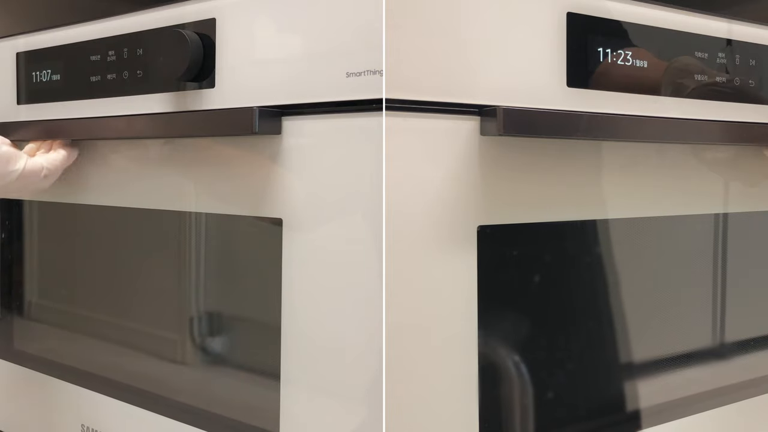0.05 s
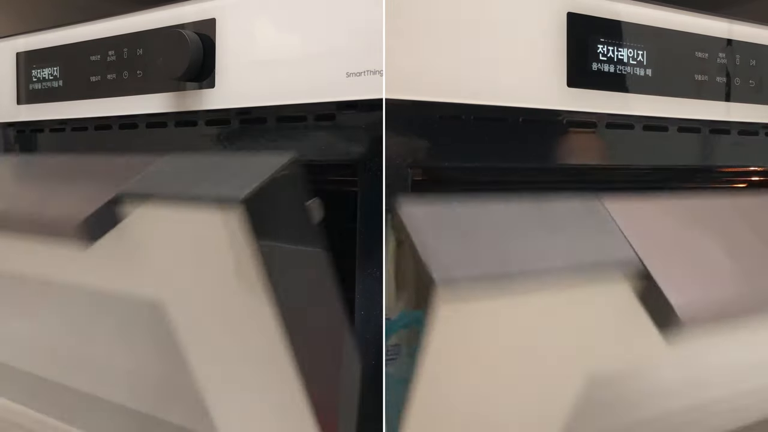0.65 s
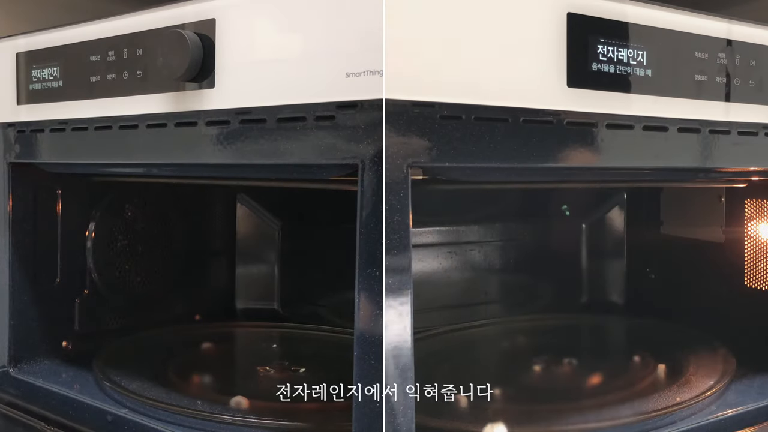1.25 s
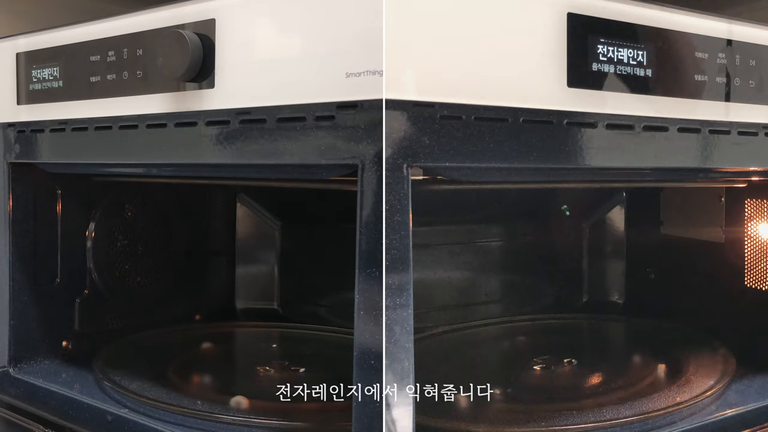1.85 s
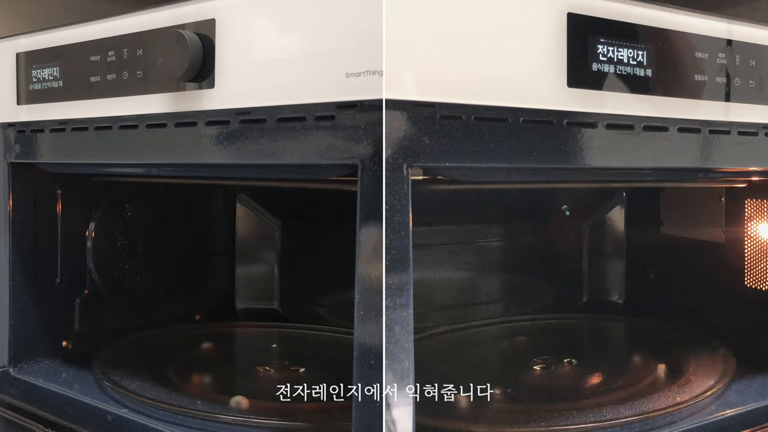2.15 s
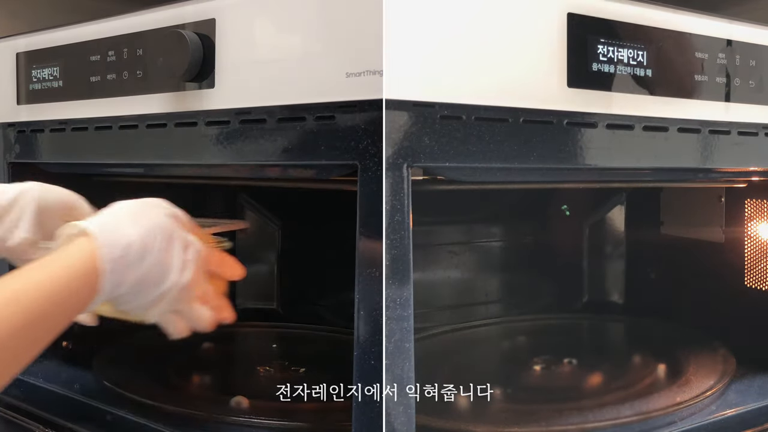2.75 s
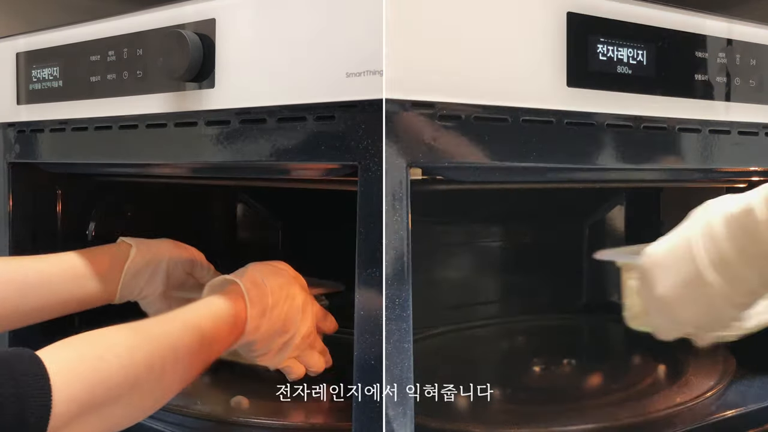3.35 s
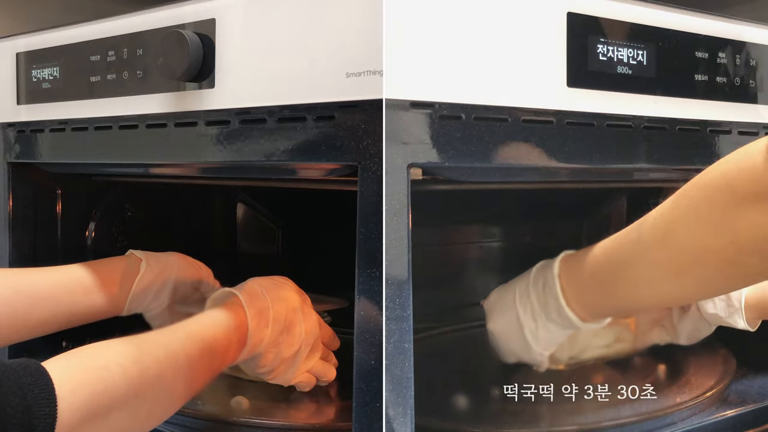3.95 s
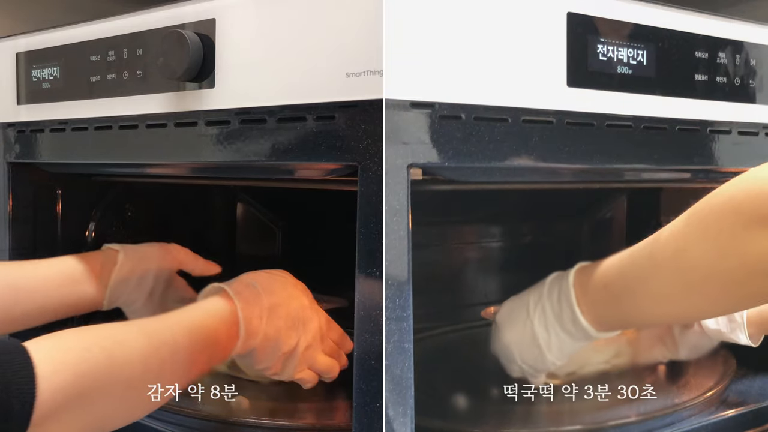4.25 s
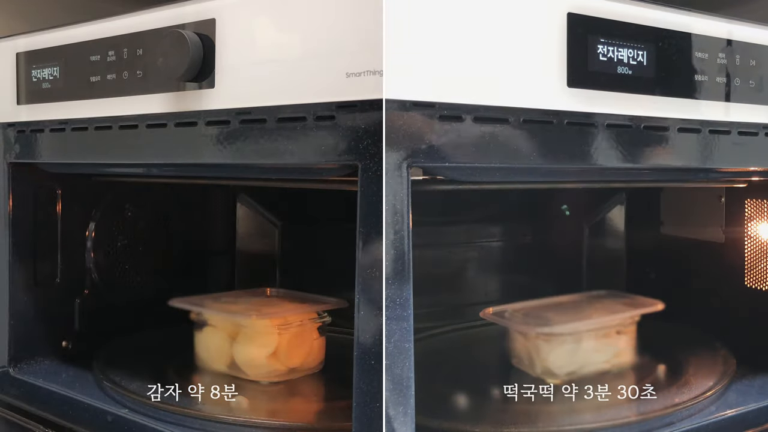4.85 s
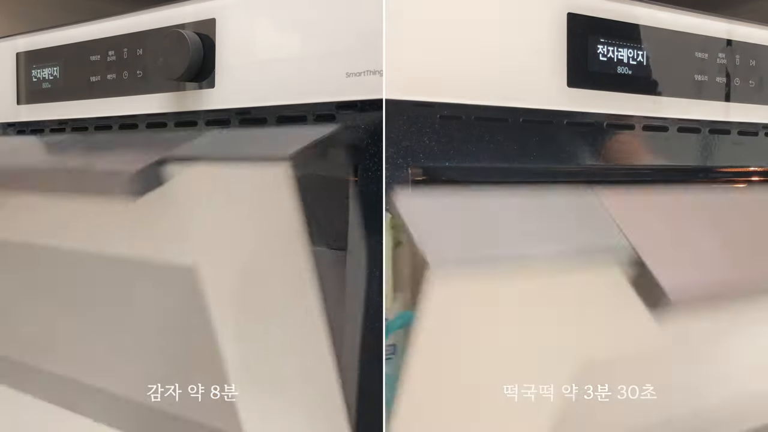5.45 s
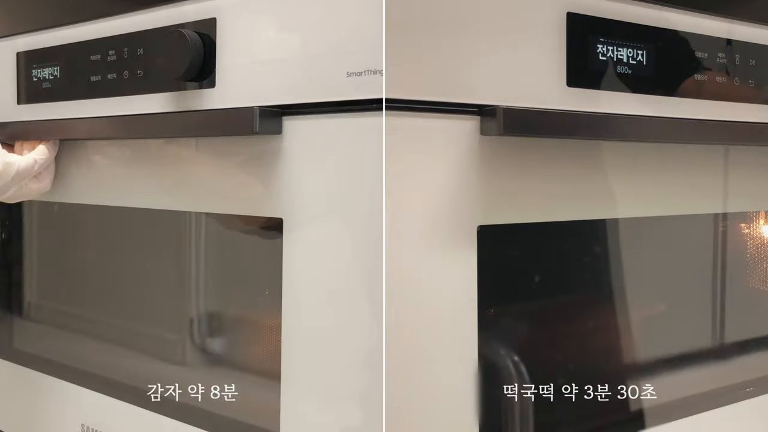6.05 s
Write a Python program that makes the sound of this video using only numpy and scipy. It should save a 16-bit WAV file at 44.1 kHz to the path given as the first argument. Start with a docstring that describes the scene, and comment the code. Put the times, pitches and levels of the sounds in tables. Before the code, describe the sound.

An oven door creaks and clicks in its steel latch, snaps free and swings down with a low rumble. Gloves and sleeves rustle faintly and a plastic lid ticks. A glass container clinks loudly onto the glass turntable and rocks to rest. The door knocks, then shuts with a thump and a last rattling click. Heard close on one microphone in a small kitchen, over a faint appliance hum.

```python
"""A glass food container clinks onto the glass turntable of a countertop oven and rocks to rest.
Before it, the oven door creaks in its latch, snaps free and swings down; afterwards the door knocks
as it is lifted, shuts with a thump and clicks again. Gloves and sleeves rustle, the plastic lid ticks
and an appliance hums faintly behind. Heard close in a small kitchen, on one microphone."""
import sys
import numpy as np
from scipy import signal
from scipy.fft import rfft, irfft, next_fast_len
from scipy.io import wavfile
from scipy.ndimage import map_coordinates

SR = 44100
rng = np.random.default_rng(int(sys.argv[2]) if len(sys.argv) > 2 else 0)


def transcribe(u):
    """Save the signal u as a 16-bit wav file named by the first command-line argument.

    u: samples, shape (n,) or (channels, n), limited to [-1, 1]; the rate is SR.
    q: integer samples, one column per channel.
    """
    v = np.clip(np.atleast_2d(u).T, -1, 1)
    q = np.round(v * 32767).astype(np.int16)
    wavfile.write(sys.argv[1], SR, q)


N = 269010

# the container landing and rocking: t/s, level/dB, contact cut-off/Hz, ring length ratio, clack/dB
LANDINGS = [(3.9088, -18.5, 2620, 0.28, 3.5), (3.9126, -19.5, 12500, 0.82, -12.5),
            (4.0111, -33, 4500, 0.77, 8), (4.022, -48.5, 169, 1.28, -3), (4.04, -35.5, 1050, 0.59, 3),
            (4.056, -43.5, 3600, 1.06, 2.5), (4.175, -56.5, 1935, 1, 1), (4.275, -59.5, 740, 0.66, 7)]
# container and turntable ringing together: f/Hz, level/dB, t60/s
GLASS_MODES = [(142, -31, .65), (232, -27, .3), (445, -24, .15), (530, -24, .18), (606, -18, .2),
               (860, -17, .24), (918, -4, .08), (972, -13, .19), (1015, -16, .2), (1085, -14, .16),
               (1440, -22, .24), (1493, -11, .09), (1641, -16, .14), (1690, -9, .15), (1794, -12, .23),
               (1981, -11, .12), (2060, -15, .12), (2165, -16, .17), (2617, -5, .14), (2686, -12, .14),
               (2875, -8, .14), (2917, 1, .085), (3338, -16, .1), (3564, -20, .19), (4097, -8, .115),
               (4224, -12, .07), (4642, -23, .17), (5352, -14, .14), (5643, -21, .17), (6740, -31, .2),
               (9195, -34, .12)]
# spectra of glass clacking and grinding on glass: f/Hz, level/dB
GLASS_CLACK = [(80, -31), (350, -20.5), (700, -12), (950, -1.5), (1250, -17), (1700, -3), (2300, -8.5),
               (2900, -2), (3400, -14), (4500, -16.5), (7000, -32.5), (16000, -35.5)]
GLASS_GRIT = [(500, -27.5), (4000, -1), (8500, 0), (12000, -7.5), (16000, -8.5)]
# blows on the door panel: t/s, level/dB, contact cut-off/Hz
DOOR_BLOWS = [(0.289, -53.5, 1490), (0.41, -57, 353), (0.48, -50, 700), (0.504, -47.5, 740),
              (0.529, -31.5, 1590), (0.551, -40, 910), (0.968, -63.5, 1170), (5.764, -41, 752),
              (5.779, -42.5, 450), (5.876, -53.5, 400), (5.975, -59.5, 450), (6.028, -53.5, 710)]
# modes of the hollow door and of its boom on the seal: f/Hz, level/dB, t60/s
DOOR_MODES = [(176, -14.5, 1), (307, -5, 0.28), (399.4, -3.5, 0.19), (485, 5, 0.084), (544, -2, 0.25),
              (690, -9, 0.071), (773, -1.5, 0.062), (847, 14.5, 0.03)]
BOOM_MODES = [(71, -9, 0.16), (93, -3, .2), (119, -29.5, 0.23)]
# spectra of the door's rattle and of its hinges: f/Hz, level/dB
DOOR_RATTLE = [(80, -47), (300, -26), (700, -3), (1100, -12), (3000, -18), (9000, -47)]
HINGE_RUMBLE = [(40, -10), (80, 4), (180, 4), (320, 0.5), (440, -4), (700, -9), (1500, -16.5), (4000, -39)]
# the door's swings, one curve down and one up: t/s, level/dB
SWINGS = [
    [(0, -93), (0.15, -64), (0.35, -67), (0.5, -48), (0.68, -58), (0.8, -69.5), (0.87, -90), (0.98, -62),
     (1.15, -83)],
    [(5.1, -43.5), (5.2, -60.5), (5.3, -69.5), (5.42, -68), (5.6, -81), (5.76, -81), (5.84, -57),
     (5.95, -63.5), (6.1, -48)],
]
# latch clicks and, at 6.065 s, a faint bright rattle leading into the last click:
# t/s, level/dB, tilt/(dB per octave), rattle t60/s
CLICKS_AND_RATTLE = [(0.2655, -51, 9, 0.11), (0.292, -49.5, 2.5, 0.13), (0.3708, -52, -1, 0.077),
                     (0.4023, -48.5, 5.5, 0.13), (0.4755, -46.5, 0, 0.24), (0.526, -36, 1, .13),
                     (0.667, -55.5, 5.5, 0.12), (5.762, -41.5, -3, 0.1), (5.768, -41.5, -5, 0.19),
                     (6.065, -52, 6, 0.25), (6.082, -42.5, 4.5, 0.49), (6.096, -38.5, 7, 0.06)]
# modes of the steel latch: f/Hz, level/dB, t60/s
STEEL_MODES = [(1323, 0, 0.14), (1477, 4.5, 0.16), (1747, 7, 0.16), (2056, -18, 0.204), (2030, 10, 0.11),
               (2475, -3, 0.26), (2600, -8, 0.047), (2820, -15, 0.047), (3230, -24, 0.07),
               (3210, -4.5, 0.32), (3510, -15, 0.16), (4230, 0, 0.13), (4130, -30, 0.47),
               (6020, -7.5, 0.11), (6400, 0, 0.06), (6600, -6, 0.22), (7350, 5, 0.11), (8040, -14, 0.17),
               (11100, 1, 0.069)]
# spectrum of its loose parts: f/Hz, level/dB
STEEL_RATTLE = [(150, -4), (500, -12), (1100, -7.5), (2200, -1), (4000, -1), (5200, -6), (7000, -3.5),
                (8300, -6.5), (11000, -8.5), (16000, -10.5)]
# dull knocks on the oven's casing: t/s, level/dB, contact cut-off/Hz, pitch ratio
KNOCKS = [(2.324, -48.5, 228, 0.83), (5.0794, -30, 1560, 1.008), (5.104, -48, 451, 1.03),
          (5.441, -55.5, 150.5, 1.07), (5.763, -49, 276, 1.05)]
# modes of the casing: f/Hz, level/dB, t60/s
CASING_MODES = [(177.5, -30, 0.6), (280, -8, 0.14), (404, -27, 0.22), (558.4, 2, 0.054), (680, 2, 0.032),
                (874, 3.5, 0.045), (1168, -15, 0.074), (1505, -12, 0.039), (1577, -20.5, 0.057)]
# spectrum of its rattle: f/Hz, level/dB
CASING_RATTLE = [(70, -27), (140, 13.5), (300, -9), (800, -19), (1600, 7), (2600, -34), (6000, 5),
                 (14000, -37)]
# the clearest ticks of fingers on the plastic lid: t/s, level/dB
LID_TICKS = [(0.067, -62.5), (0.1, -68.5), (0.967, -66), (1.203, -75.5), (1.854, -71), (2.1, -69.5),
             (2.335, -63), (2.531, -67), (3.219, -64.5), (3.695, -68.5), (3.868, -64), (3.884, -55),
             (4.91, -63), (5.079, -53.5), (5.387, -63)]
# spectra of a lid tick and of sliding fabric: f/Hz, level/dB
LID_SPECTRUM = [(300, -9.5), (1200, -1.5), (2300, 1), (5000, 4.5), (8000, -8.5), (16000, -20)]
CLOTH_SPECTRUM = [(300, -10.5), (1200, -2), (3000, 0), (5800, -0.5), (8500, -7.5), (15500, -10.5)]
# gloves slipping on what they hold: centre t/s, level/dB, length/s, tilt/(dB per octave)
GLOVE_RUBS = [(1.48, -69.5, 0.1, 1), (3.092, -72, .038, -1.5), (3.163, -66.5, 0.036, -2),
              (3.47, -70.5, 0.071, -0.5), (3.567, -69, 0.025, -0.5), (3.65, -73.5, 0.1, -4),
              (4.221, -66.5, 0.09, -2.5), (4.318, -70, .067, 1.5), (5.411, -65.5, 0.069, 2)]
# sleeves rustling, one curve as the arms come in and one as they draw back: t/s, level/dB
SLEEVE_MOVES = [
    [(1.55, -85), (2.05, -77.5), (2.4, -81), (2.65, -76), (2.83, -69.5), (3.05, -84.5)],
    [(4.4, -84.5), (4.8, -78), (4.93, -73), (5.1, -73.5), (5.3, -80.5)],
]
# the appliance's fan spectrum and motor lines: f/Hz, level/dB
FAN_SPECTRUM = [(15, -41), (25, -3), (175, -4), (277, 0.5), (427, -9.5), (863, -17), (1070, -21),
                (4370, -29.5), (11600, -35.5), (14800, -32.5), (16000, -36.5)]
MOTOR_LINES = [(226, -83), (283, -75), (861, -92)]
# reverberation of the kitchen: f/Hz, t60/s
KITCHEN_DECAY = [(80, 0.83), (200, 1), (600, 0.56), (2000, 0.3), (6000, 0.21), (15000, 0.16)]

HEAVY_DB = -33  # a knock or landing above this makes the casing boom
BLOW_DB, BLOW_HZ = -45, 600  # level and contact cut-off of the reference door blow


def container():
    """One glass edge lands, damped at once by the next, which rings out; lighter rocking follows."""
    out = np.zeros(N)
    for s, db, contact_hz, length, clack_db in LANDINGS:
        modes = [(hz, level, t60 * length) for hz, level, t60 in GLASS_MODES]
        clink = at_level(ring(modes, attack_s=0.0024), 0)
        clink += at_level(rattle(GLASS_CLACK, t60=0.058), clack_db)
        add(out, s, in_kitchen(at_level(softened(clink, contact_hz), db), room_db=-10))
    return out


def grit():
    """The container's foot grinds on the turntable at each contact: a bright, dying scrape."""
    out = np.zeros(N)
    for s, db, *_ in LANDINGS:
        scrape = rattle(GLASS_GRIT, t60=0.16, ripple_db=6)
        add(out, s, at_level(scrape, -61 + 0.5 * (db - HEAVY_DB)))
    return out


def door():
    """The hollow door clunks at each blow and rumbles as it swings; seal and casing boom beneath."""
    out = np.zeros(N)
    for s, db, contact_hz in DOOR_BLOWS:
        clunk = at_level(ring(DOOR_MODES, attack_s=0.00086), 0)
        clunk += at_level(rattle(DOOR_RATTLE, t60=0.082), -0.14)
        add(out, s, in_kitchen(at_level(softened(clunk, contact_hz), db), room_db=-13))
    for s, db in booms():
        add(out, s, in_kitchen(at_level(ring(BOOM_MODES, attack_s=0.003), db), room_db=-14.5))
    return out + sum(fader(swing) for swing in SWINGS) * noise(HINGE_RUMBLE, N)


def booms():
    """Low booms of the flexing seal and casing, as rows of t/s, level/dB."""
    period_s, rise_db, lag_s = 0.075, 1.9, 0.014
    # the pulled door judders on its seal, harder each time
    judders = [(0.071 + k * period_s, -60 + k * rise_db) for k in range(4)]
    # heavier, softer blows flex the seal more
    flexes = [(s + lag_s, -53 + (db - BLOW_DB) + 9 * np.log2(BLOW_HZ / contact_hz))
              for s, db, contact_hz in DOOR_BLOWS]
    casing_booms = [(s + lag_s, -62.5) for s, db, *_ in KNOCKS + LANDINGS if db > HEAVY_DB]
    return judders + flexes + casing_booms


def latch():
    """Steel clicks and a faint rattle; door blows shake the latch, duller, and longer when heavier."""
    out = np.zeros(N)
    for s, db, tilt_db, t60 in CLICKS_AND_RATTLE:
        add(out, s, steel_click(db, tilt_db, contact_hz=14200, t60=t60))
    for s, db, blow_hz in DOOR_BLOWS:
        t60 = 0.24 * 2 ** ((db - BLOW_DB) / 30.5)
        add(out, s, steel_click(db - 7, tilt_db=1.5, contact_hz=3.7 * blow_hz, t60=t60))
    return out


def steel_click(db, tilt_db, contact_hz, t60):
    """A short ring of steel under a rattle of loose parts."""
    steel = ring(STEEL_MODES, attack_s=0.001, scatter_db=3)
    loose = rattle(STEEL_RATTLE, t60, ripple_db=6.5)
    click = at_level(steel, -8.5) + at_level(loose, 0)
    hz = np.fft.rfftfreq(2 * SR, 1 / SR)
    tilt = amp(tilt_db * np.log2(1 + hz / 500))
    click = irfft(rfft(click, 2 * SR) * tilt)[:SR]
    return in_kitchen(at_level(softened(click, contact_hz), db), room_db=-15)


def casing():
    """Padded knocks ring the oven's casing for a moment."""
    out = np.zeros(N)
    for s, db, contact_hz, pitch in KNOCKS:
        modes = [(hz * pitch, level, t60) for hz, level, t60 in CASING_MODES]
        knock = at_level(ring(modes, attack_s=0.004), 0)
        knock += at_level(rattle(CASING_RATTLE, t60=0.11), -9.5)
        add(out, s, in_kitchen(at_level(softened(knock, contact_hz), db), room_db=-17))
    return out


def lid():
    """The plastic lid ticks under the fingers; faint ticks fall at random while it is carried."""
    out = np.zeros(N)
    faint = [(s, -73) for s in rng.uniform(1.1, 4.7, size=6)]
    for s, db in LID_TICKS + faint:
        tick = rattle(LID_SPECTRUM, t60=0.022)
        add(out, s, in_kitchen(at_level(tick, db), room_db=-5.5))
    return out


def hands():
    """A glove grips the handle, sleeves rustle with the arms, and the gloves slip in short rubs."""
    grip = stroke(s=0.11, db=-66, length_s=0.42) * cloth(tilt_db=-6)
    arm_motion = sum(fader(move) for move in SLEEVE_MOVES) * amp(1.4 * wobble(25))
    sleeves = arm_motion * cloth(tilt_db=2.5)
    rubs = sum(stroke(s, db, length_s) * cloth(tilt_db) for s, db, length_s, tilt_db in GLOVE_RUBS)
    return grip + sleeves + rubs


def cloth(tilt_db):
    """Fabric catching and sliding in tiny grains, tilted by tilt_db per octave, rms 1."""
    spectrum = [(hz, level + tilt_db * np.log2(hz)) for hz, level in CLOTH_SPECTRUM]
    hiss = noise(spectrum, N, ripple_db=3)
    return unit(hiss * amp(3.1 * wobble(230)))


def appliance():
    """In the background, a fan's soft rush with a few unsteady motor lines."""
    t = np.arange(N) / SR
    hum = sum(amp(db) * np.sqrt(2) * np.sin(2 * np.pi * hz * t + 0.41 * wobble(1.4))
              for hz, db in MOTOR_LINES)
    return hum + amp(-68) * noise(FAN_SPECTRUM, N)


def in_kitchen(x, room_db):
    """The direct sound, then the small room's answer, whose treble dies first."""
    hz, t, bands = signal.stft(rng.standard_normal(SR), SR, nperseg=256)
    decay = amp(-60 * t / along(KITCHEN_DECAY, hz)[:, None])
    tail = signal.istft(bands * decay, SR, nperseg=256)[1]
    tail[:SR // 200] = 0  # reflections reach the microphone 5 ms late
    return x + amp(room_db) * signal.fftconvolve(x, tail / np.linalg.norm(tail))[:len(x)]


def ring(modes, attack_s, scatter_db=1):
    """One second of struck modes, neighbours in opposite phase; each blow weights them differently."""
    t = np.arange(SR) / SR
    hz, db, t60 = np.transpose(modes)[:, :, None]
    signs = (-1) ** np.arange(len(hz))[:, None]
    weights = signs * amp(db + scatter_db * rng.standard_normal(hz.shape))
    partials = weights * amp(-60 * t / t60) * np.sin(2 * np.pi * hz * t)
    return partials.sum(0) * (1 - np.exp(-t / attack_s))


def rattle(spectrum, t60, ripple_db=4):
    """Countless short modes that blur into a dying noise."""
    return noise(spectrum, SR, ripple_db) * amp(-60 * np.arange(SR) / SR / t60)


def noise(spectrum, size, ripple_db=0):
    """Coloured noise of rms 1; the ripple stands for many small resonances."""
    hz = np.fft.rfftfreq(size, 1 / SR)
    knot = 70 * np.log1p(hz / 1500)  # resonances widen towards the treble
    ripple = map_coordinates(rng.standard_normal(int(knot[-1]) + 4), [knot])
    colour = amp(along(spectrum, hz) + ripple_db * ripple)
    return unit(irfft(rfft(rng.standard_normal(size)) * colour, size))


def softened(x, contact_hz):
    """A longer, softer contact excites less treble."""
    return signal.sosfilt(signal.butter(2, contact_hz, fs=SR, output="sos"), x)


def stroke(s, db, length_s):
    """The gain of a stroke that swells and fades around time s."""
    return amp(db) * np.exp(-2 * ((np.arange(N) / SR - s) / length_s) ** 2)


def fader(rows):
    """A gain per sample from rows of t/s, level/dB, silent outside them."""
    s, db = np.transpose(rows)
    return amp(np.interp(np.arange(N) / SR, s, db, left=-120, right=-120))


def wobble(rate):
    """A smooth random curve, rate knots a second."""
    return map_coordinates(rng.standard_normal(int(N * rate / SR) + 4), [np.arange(N) * rate / SR])


def along(points, hz):
    """Interpolates rows of f/Hz, value on a log frequency axis."""
    f, values = np.transpose(points)
    return np.interp(np.log(hz + 1), np.log(f + 1), values)


def at_level(x, db):
    """Sets the rms level of a blow's first 10 ms."""
    return amp(db) * x / np.sqrt(np.mean(x[:SR // 100] ** 2) + 1e-20)


def unit(x):
    """Scales x to rms 1."""
    return x / np.sqrt(np.mean(x ** 2) + 1e-20)


def amp(db):
    """Decibels to amplitude."""
    return 10 ** (np.asarray(db) / 20)


def add(track, s, x):
    """Mixes x into the track from time s."""
    part = track[round(s * SR):][:len(x)]
    part += x[:len(part)]


def scene():
    """Oven, glass and handling at the counter, over the appliance's hum, in mono."""
    oven = latch() + door() + casing()
    glass = container() + grit()
    handling = hands() + lid()
    return (oven + glass + handling + appliance())[None]


def record(dry):
    """The microphone sheds the deepest bass and keeps nothing above its band limit."""
    low_cut_hz, top_hz = 45, 16300
    thin = signal.sosfilt(signal.butter(2, low_cut_hz, "highpass", fs=SR, output="sos"), dry)
    size = next_fast_len(N + SR // 2)
    in_band = np.fft.rfftfreq(size, 1 / SR) < top_hz
    return irfft(rfft(thin, size) * in_band, size)[:, :N]


dry = scene()
out = record(dry)
transcribe(out)
```